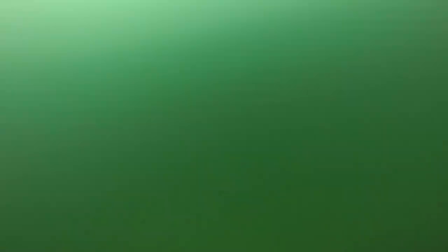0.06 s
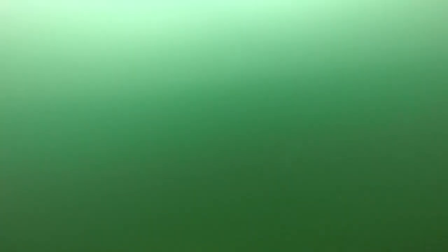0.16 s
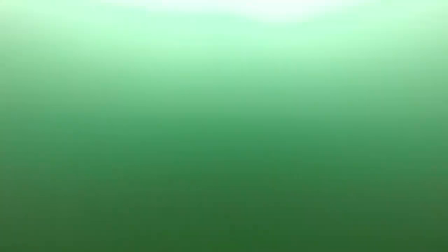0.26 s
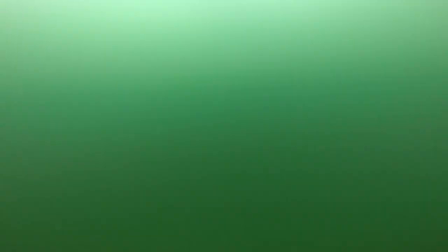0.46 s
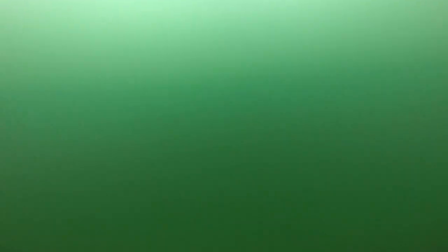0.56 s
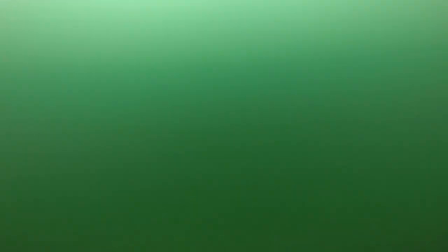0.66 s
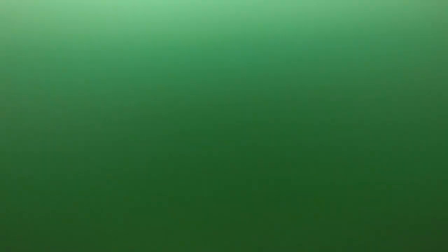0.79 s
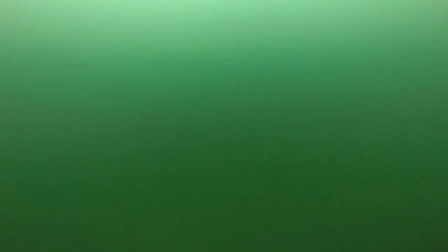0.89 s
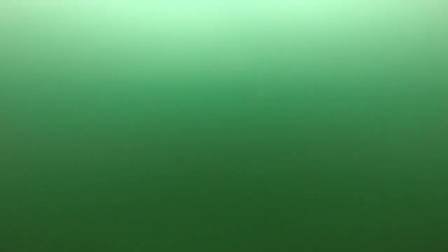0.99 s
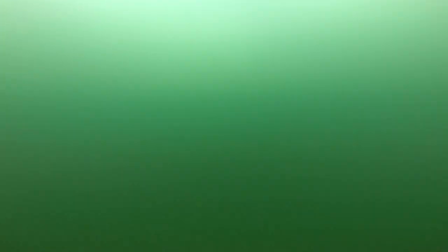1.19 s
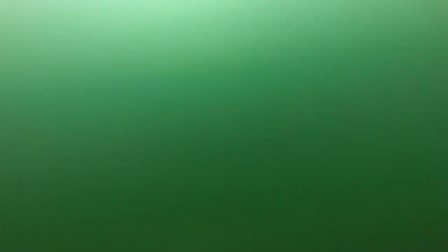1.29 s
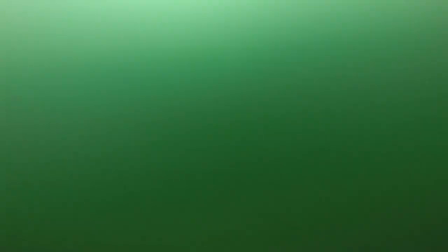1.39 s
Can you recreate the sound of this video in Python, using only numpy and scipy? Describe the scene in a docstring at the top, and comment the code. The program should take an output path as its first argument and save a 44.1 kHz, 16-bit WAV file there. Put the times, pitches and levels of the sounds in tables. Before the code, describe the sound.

Something knocks sharply twice on a submerged case, with faint ticks and low water noise behind.

```python
"""Under the ice of a lake, a camera hangs in a watertight case. Something knocks twice on the case,
which rings near 2 kHz, only briefly because the water damps it. Faint ticks come before and after.
Behind them are a low wash of water, soft swishes, traces of fizz and a deep rumble as the camera
sways, all made of shaped noise, and the hiss and thin whine of the camera's electronics."""
import sys
import numpy as np
from scipy import signal
from scipy.fft import rfft, irfft
from scipy.io import wavfile

SR = 44100
rng = np.random.default_rng(int(sys.argv[2]) if len(sys.argv) > 2 else 0)


def dump(signal):
    """Clip the signal to [-1, 1] and save it as 16-bit WAV at the path in sys.argv[1]."""
    limited = np.clip(np.atleast_2d(signal).T, -1, 1)
    pcm = np.round(limited * 32767).astype(np.int16)
    wavfile.write(sys.argv[1], SR, pcm)


N = 63945
T = np.arange(N) / SR

# how strong the wash and hiss are from low to high: (frequency [Hz], relative level [dB])
WASH_SPECTRUM = [(12, -31), (20, -6), (32, -5), (144, -9.5), (352, -14.5), (834, -16.5), (1230, -22.5),
                 (1770, -21), (4070, -30), (5690, -31.5), (8400, -38), (9130, -37), (9930, -40),
                 (14300, -44), (15500, -57)]
# how their loudness drifts: (time [s], added level [dB])
WASH_SWELL = [(0, 3), (0.2, 0.5), (0.45, 0.03), (0.95, -0.04), (1.3, 0), (1.45, 0.5)]
# tones of the electronics: (frequency [Hz], level [dB], flutter depth [0-1])
WHINE_TONES = [(2927, -81, .4), (5853, -81.5, .35), (8778, -80.5, 0.11), (11707, -86, .35)]
# sways of the camera: (start [s], length [s], level [dB])
SWAYS = [(0.988, 0.13, -57), (1.142, 0.12, -50), (1.29, 0.15, -56.5)]
# soft swishes of water: (start [s], length [s], level [dB], centre frequency [Hz], width [Hz])
SWISHES = [(-0.08, 0.25, -56, 723, 200), (-0.05, 0.15, -66, 1820, 1370), (0.659, 0.077, -60, 820, 714),
           (0.890, 0.0091, -55, 760, 300), (1.256, 0.098, -68, 1680, 690)]
# faint fizz in the water: (start [s], length [s], level [dB])
FIZZES = [(0.706, 0.018, -68), (0.891, 0.0089, -62.5)]
# tones the case rings with: (frequency [Hz], relative level [dB], time to fade by 60 dB [s])
CASE_TONES = [(831.7, -22.5, 0.0092), (1560, -4, 0.0057), (1832, -6, .033), (1957, -1, .0105),
              (2302, -1.05, .0183), (2668, -14, 0.0216), (2823, -22, .024), (3295, -17, .011),
              (4190, -17.5, 0.0088), (5582, -22.5, .014), (6856, -22, .0055), (8550, -11.5, .0033),
              (10150, -15.5, .004), (12610, -14.5, .0019)]
# narrow bands where the case barely vibrates: (frequency [Hz], width [Hz], depth [dB])
CASE_NOTCHES = [(980, 411, -16.5), (2508, 160, -15), (3046, 217, -34.5), (3737, 207, -13), (4830, 230, -10),
                (6100, 180, -5), (7800, 319, -13.5), (8500, 293, -10), (11392, 590, -30)]
# faint ticks on the case: (time [s], level [dB], share of the full ring time [0-1])
TICKS = [(0.0445, -41.5, 0.59), (0.204, -37.5, 0.49), (0.6399, -28.5, 0.19), (1.1226, -47.5, 0.56),
         (1.3358, -44, 0.66)]
# knocks on the case: (time [s], level [dB], extra lows [dB], extra middle [dB], extra highs [dB])
KNOCKS = [(0.2453, -7.5, -3, -6.5, 3.5), (0.3238, -0.5, 0.5, 0, 0)]


def from_db(db):
    """Turn decibels into a number to multiply a sound by."""
    return 10 ** (np.asarray(db) / 20)


def unit_level(x):
    """Scale a sound so that its average level (rms) is 1."""
    return x / np.sqrt(np.mean(x ** 2) + 1e-20)


def keep_band(x, kind, hz, order):
    """Keep the "low" or "high" side of a frequency; a higher order cuts the rest more steeply."""
    return signal.sosfilt(signal.butter(order, hz, kind, fs=SR, output="sos"), x + 1e-18)


def resonant_noise(hz, width_hz):
    """Noise passed twice through one resonance, so it gathers around one pitch."""
    b, a = signal.iirpeak(hz, hz / width_hz, fs=SR)
    once = signal.lfilter(b, a, rng.standard_normal(2 * N))
    return unit_level(signal.lfilter(b, a, once)[N:])  # the filter has settled by the second half


def arch(start, length):
    """A loudness curve that rises and falls as half a sine wave."""
    return np.sin(np.pi * np.clip((T - start) / length, 0, 1))


def wash_and_hiss(level_db=-59):
    """The water makes a steady dull noise that runs up into the faint hiss of the electronics."""
    hz, db = np.transpose(WASH_SPECTRUM)
    all_hz = np.maximum(np.arange(N // 2 + 1) * SR / N, 1)
    gains = from_db(np.interp(np.log(all_hz), np.log(hz), db))
    noise = irfft(rfft(rng.standard_normal(N)) * gains, N)
    noise = unit_level(keep_band(noise, "low", hz=14800, order=16))
    swell_db = np.interp(T, *np.transpose(WASH_SWELL))
    return from_db(level_db + swell_db) * noise


def electronics_whine(flutter_hz=29.99):
    """The electronics give off four thin, high tones whose loudness flutters slightly."""
    out = np.zeros(N)
    for hz, db, depth in WHINE_TONES:
        phase, flutter_phase = rng.uniform(0, 2 * np.pi, 2)
        flutter = 1 + depth * np.sin(2 * np.pi * flutter_hz * T + flutter_phase)
        out += from_db(db) * unit_level(flutter * np.sin(2 * np.pi * hz * T + phase))
    return out


def sway_rumble():
    """The water pressure swells in a deep rumble as the camera sways."""
    noise = keep_band(rng.standard_normal(2 * N), "low", hz=25, order=2)[N:]
    loudness = sum(from_db(db) * arch(start, length) for start, length, db in SWAYS)
    return loudness * unit_level(noise)


def stirring_water():
    """Water stirs around the case in short hollow swishes and traces of fizz."""
    swishes = sum(from_db(db) * arch(start, length) * resonant_noise(hz, width_hz)
                  for start, length, db, hz, width_hz in SWISHES)
    fizz_loudness = sum(from_db(db) * arch(start, length) for start, length, db in FIZZES)
    return swishes + fizz_loudness * resonant_noise(hz=3800, width_hz=5300)


def case_ring(start, level_db, low_db=0, middle_db=0, high_db=0, ring_share=1, rise_s=0.00014):
    """One hit sets all the tones of the case ringing, and the water quickly damps them."""
    age = np.maximum(T - start, 0)
    out = np.zeros(N)
    for k, (hz, tone_db, fade_s) in enumerate(CASE_TONES):
        extra_db = low_db * (hz < 1900) + middle_db * (3000 < hz < 6200) + high_db * (hz > 7500)
        gain = from_db(level_db + tone_db + extra_db)
        fade = from_db(-60 * np.minimum(age / (fade_s * ring_share), 10))
        direction = (-1) ** k  # neighbouring tones start in opposite directions
        out += direction * gain * fade * np.sin(2 * np.pi * hz * age)
    return out * (1 - np.exp(-age / rise_s))


def knocks_and_ticks():
    """Hits as heard inside the case, hollowed out at the pitches where it barely vibrates."""
    knocks = sum(case_ring(*knock) for knock in KNOCKS)
    ticks = sum(case_ring(start, db, ring_share=share) for start, db, share in TICKS)
    out = knocks + ticks
    for hz, width_hz, depth_db in CASE_NOTCHES:
        b, a = signal.iirpeak(hz, hz / width_hz, fs=SR)
        band = signal.lfilter(b, a, out + 1e-18)
        out -= (1 - from_db(depth_db)) * band
    out = keep_band(out, "high", hz=100, order=1)
    return keep_band(out, "low", hz=13900, order=8)


def scene():
    """All the sounds add up at one microphone."""
    background = wash_and_hiss() + stirring_water() + sway_rumble() + electronics_whine()
    return (background + knocks_and_ticks())[None]


def record(dry):
    """The very highest treble is cut off steeply."""
    return keep_band(dry, "low", hz=16240, order=16)


dry = scene()
out = record(dry)
dump(out)
```